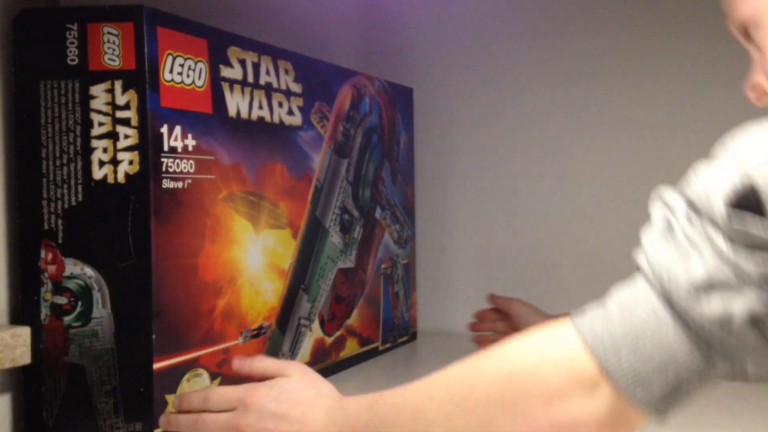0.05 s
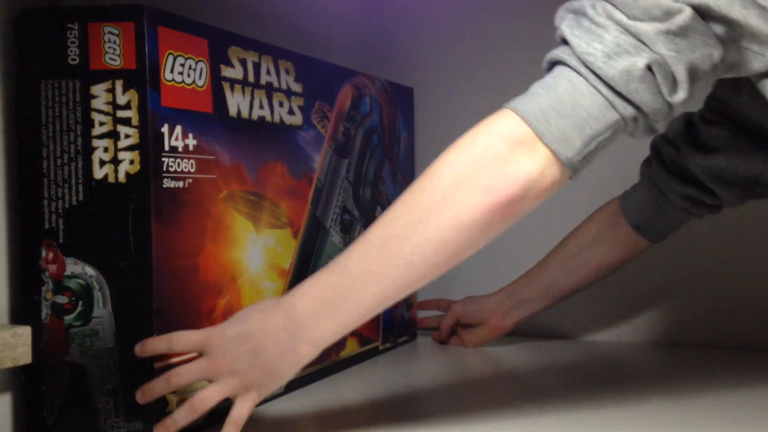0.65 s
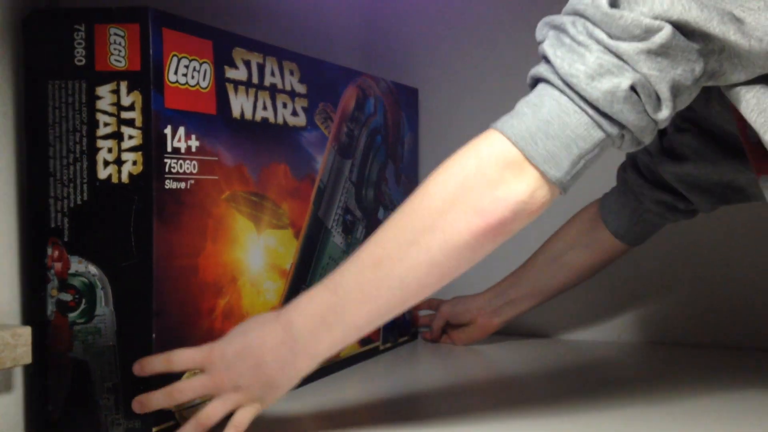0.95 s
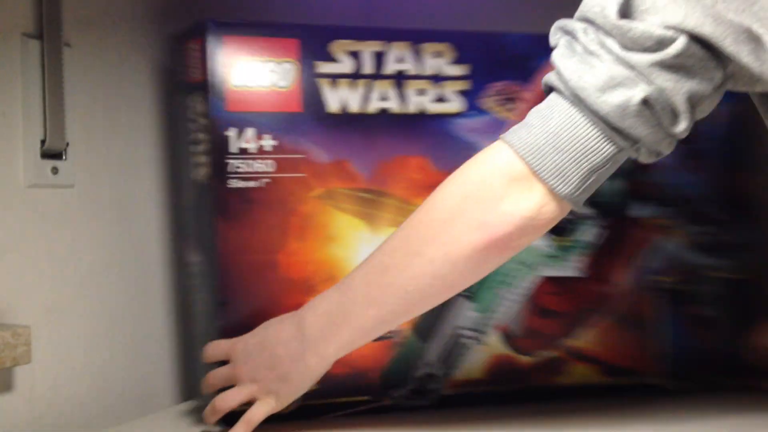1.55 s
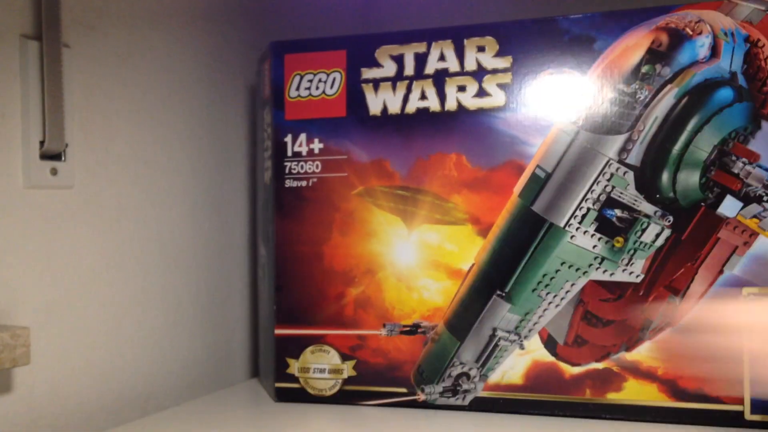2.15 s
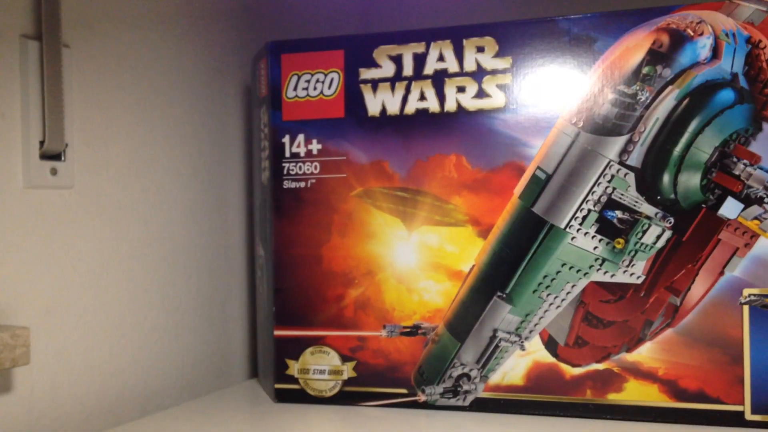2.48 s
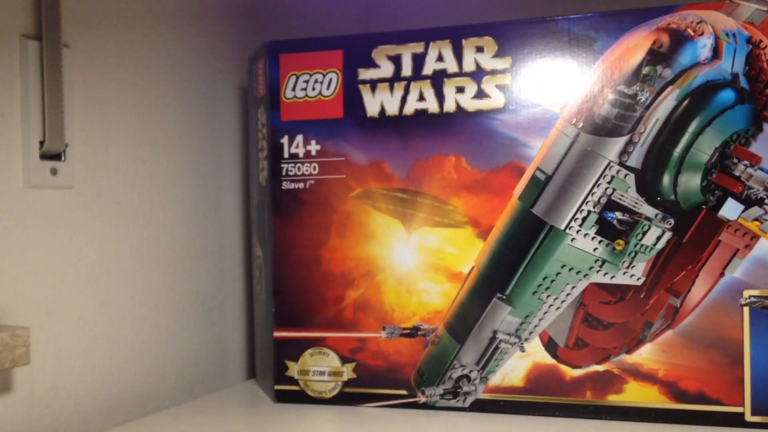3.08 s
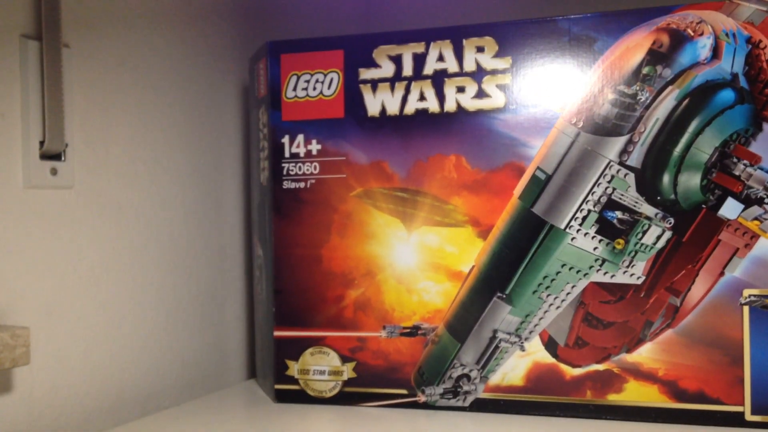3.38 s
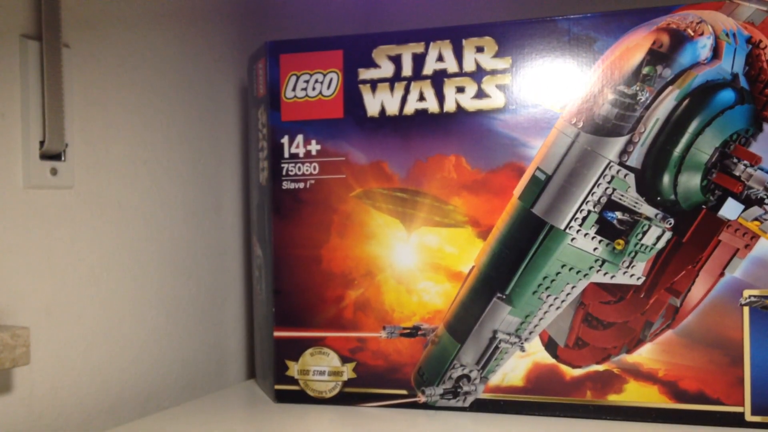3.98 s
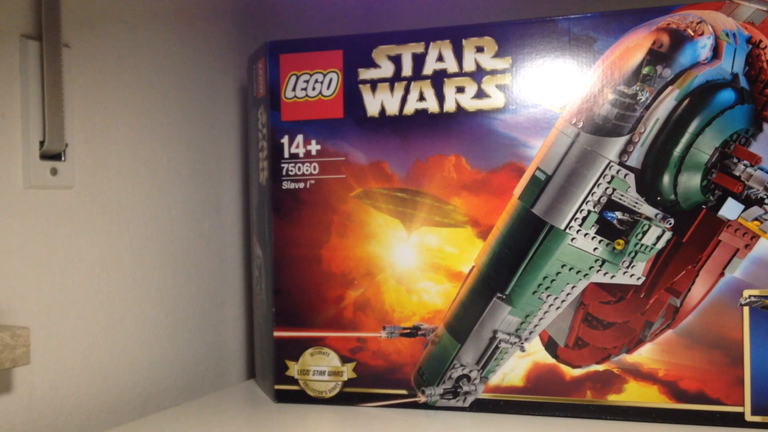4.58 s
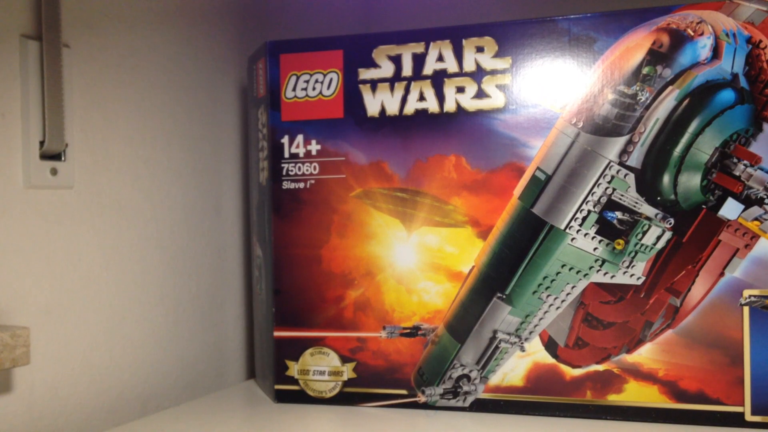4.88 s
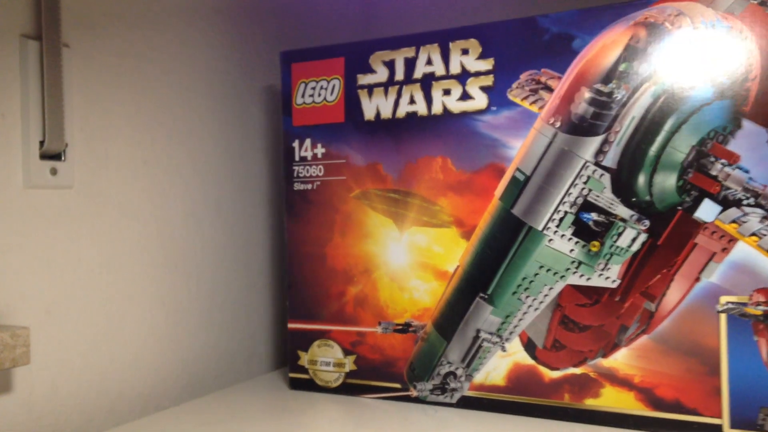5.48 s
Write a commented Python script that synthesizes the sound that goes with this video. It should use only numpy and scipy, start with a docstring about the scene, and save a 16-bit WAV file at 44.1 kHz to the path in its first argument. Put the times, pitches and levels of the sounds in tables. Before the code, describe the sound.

Hands grip and drag a large cardboard box across a shelf, with hollow knocks and a scrape, then bump the microphone.

```python
"""A small room with a large cardboard box on a shelf. Hands brush the box, grip it and drag it round:
skin and card catch and slip, the bottom edge scrapes and hisses, the hollow panels knock and wobble,
and the shelf sways. Sleeves swish, two soft thuds ring boards farther off, then a hand bumps and
rubs the camera. Faint mains hum and room air lie underneath."""
import sys
import numpy as np
from scipy import signal
from scipy.fft import rfft, irfft, next_fast_len
from scipy.io import wavfile
from scipy.ndimage import map_coordinates

SR = 44100
rng = np.random.default_rng(int(sys.argv[2]) if len(sys.argv) > 2 else 0)


def wrap_up_sound(samples):
    """Save the sound to the file named by the first command line argument, as 16-bit audio."""
    columns = np.atleast_2d(samples).T
    # keep every value between -1 and 1, then stretch to whole-number steps
    tamed = np.clip(columns, -1, 1)
    steps = np.round(tamed * 32767).astype(np.int16)
    wavfile.write(sys.argv[1], SR, steps)


N = 252693


def amp(db):
    """Decibels to gain."""
    return 10 ** (np.asarray(db) / 20)


def unit(x):
    """Scale to rms 1."""
    return x / np.sqrt(np.mean(x ** 2) + 1e-20)


def along(points, hz):
    """Read (Hz, value) points on a log frequency axis."""
    freqs, values = np.transpose(points)
    return np.interp(np.log(hz + 1), np.log(freqs + 1), values)


def filtered(x, response):
    """Pass x through a complex frequency response."""
    size = next_fast_len(len(x) + SR // 2)
    return irfft(rfft(x, size) * response(np.fft.rfftfreq(size, 1 / SR)), size)[:len(x)]


def coloured(x, eq):
    """Shape x with an EQ curve, at rms 1."""
    return unit(filtered(x, lambda hz: amp(along(eq, hz))))


def body(modes, f):
    """Frequency response of a set of resonances, alternating in polarity."""
    return sum((-1) ** k * amp(db) * 1j * f * width / (hz * hz - f * f + 1j * f * width)
               for k, (hz, width, db) in enumerate(modes))


def wander(rate, n):
    """A smooth random curve with `rate` turning points a second."""
    return map_coordinates(rng.standard_normal(int(n * rate / SR) + 4), [np.arange(n) * rate / SR])


def friction(catch_rate, catch_db, grain_db):
    """Fibres catching and letting go: noise that swells in slips and in tiny grains."""
    return rng.standard_normal(N) * amp(catch_db * wander(catch_rate, N) + grain_db * wander(1500, N))


def stroke(start, length, attack, release):
    """One movement's envelope: it builds, holds to its length, then loses 20 dB every release time."""
    t = np.arange(N) / SR - start
    return np.clip(t / attack, 0, 1) * amp(-20 * np.maximum(t - length, 0) / release)


def blow(modes, hard_hz):
    """A soft push rings a body, peak 1; a harder contact reaches the higher modes."""
    t = np.arange(SR // 2) / SR
    push = t * np.exp(-2 * np.pi * hard_hz * t)
    ring = filtered(push, lambda f: body(modes, f))
    return ring / np.abs(ring).max()


def add(track, start, sound):
    """Mix a sound into the track at a start in seconds."""
    part = track[max(round(start * SR), 0):][:len(sound)]
    part += sound[:len(part)]


# The dark bed of room air. Each row: frequency in Hz, EQ gain in dB.
AIR_EQ = [(25, -8), (60, -13.5), (100, -7.5), (200, -11), (300, -9), (420, -9), (560, -15.5), (1000, -18),
          (1600, -23), (4000, -26), (9000, -30), (15000, -32.5)]
# Mains harmonics. Each row: pitch in Hz, level in dB.
HUM_PARTIALS = [(100, -83.5), (300, -81), (400, -79.5), (500, -89.5)]

def room_tone():
    """Steady air under a mains hum whose partials waver in level."""
    t = np.arange(N) / SR
    hum = sum(amp(db + wander(2.77, N)) * np.sqrt(2) * np.sin(2 * np.pi * (hz * t + rng.random()))
              for hz, db in HUM_PARTIALS)
    return hum + amp(-70.5) * coloured(rng.standard_normal(N), AIR_EQ)


# Skin and sleeve swishes. Each row: start, length and release in seconds, relative level in dB.
BRUSH_STROKES = [(-.04, 0.085, 0.26, -46), (0.088, 0.18, 0.034, -61.5), (2.147, .03, 0.054, -64),
                 (2.19, .04, 0.033, -63), (2.654, 0.081, 0.19, -69.5), (2.745, 0.11, 0.052, -65.5),
                 (3.871, 0.028, 0.079, -62)]
# The airy top of cloth. Each row: frequency in Hz, EQ gain in dB.
CLOTH_EQ = [(300, -9), (1400, -12), (2150, -2.5), (2900, -5.5), (4300, 0), (5800, 1.5), (7800, 0),
            (11000, -5.5), (15500, -6)]

def brushes():
    """Light strokes of skin and sleeve catch fine fibres and swish."""
    strength = sum(amp(db) * stroke(start, length, attack=0.34 * length, release=release)
                   for start, length, release, db in BRUSH_STROKES)
    fibres = friction(catch_rate=70, catch_db=1, grain_db=2)
    return amp(-1) * strength * coloured(fibres, CLOTH_EQ)


# Hands shifting their grip. Each row: start and length in seconds, relative rub and rustle levels in dB.
HAND_MOVES = [(-.04, 0.23, -68.5, -72.5), (0.226, 0.11, -65.5, -79), (.465, 0.059, -61.5, -72.5),
              (0.57, 0.3, -74, -82.5), (0.71, 0.035, -60, -92), (0.831, 0.21, -57.5, -73.5),
              (1.893, 0.24, -66.5, -72.5), (2.203, 0.058, -67, -68), (2.327, 0.044, -65.5, -75.5),
              (2.404, 0.093, -77, -73.5), (2.53, 0.18, -83, -79.5), (3.028, 0.11, -77, -78.5),
              (3.146, 0.21, -67.5, -75), (3.4, 0.22, -85, -80), (3.583, 0.12, -67.5, -74),
              (4.86, .12, -71, -81.5), (4.995, 0.45, -66.5, -79.5), (5.233, 0.16, -62.5, -73.5),
              (5.35, 0.053, -54, -62.5), (5.45, .18, -59, -68), (5.639, 0.031, -52, -68)]
RUB_ATTACK_S, RUB_RELEASE_S = 0.029, 0.14

def rub_envelopes():
    """Strength of the palms' rub and of its rustle; overlapping movements add in power."""
    power = sum(np.outer(amp(levels), stroke(start, length, RUB_ATTACK_S, RUB_RELEASE_S)) ** 2
                for start, length, *levels in HAND_MOVES)
    return np.sqrt(power)


# The dull rub of a palm. Each row: frequency in Hz, EQ gain in dB.
SKIN_EQ = [(100, 7), (250, 7), (450, 5), (750, 0.5), (1300, -6), (2100, -7.5), (3000, -28.5), (6000, -27),
           (15000, -27.5)]
# The papery edge of rustles and ticks. Each row: frequency in Hz, EQ gain in dB.
RUSTLE_EQ = [(1500, 0), (3000, -3), (5000, -4.5), (9000, -7), (15000, -12)]

def rubs():
    """Palms creep over the surface in uneven slips, with a fine rustle on top."""
    rub, rustle = rub_envelopes()
    slips = friction(catch_rate=70, catch_db=1.5, grain_db=1.1)
    return rub * coloured(slips, SKIN_EQ) + amp(4) * rustle * coloured(slips, RUSTLE_EQ)


# Short slides of skin, sleeve and card. Each row: start and length in seconds, level in dB,
# pitch in Hz, glide as a share of the pitch, bandwidth in Hz.
SHORT_SLIDES = [(.005, .097, -50.5, 5980, -.05, 2600), (0, .11, -63, 2200, 0.0015, 500),
                (0.459, 0.089, -52.5, 749, .11, 760), (0.479, 0.068, -60, 1895, -0.075, 826),
                (1.07, .095, -52, 931, -0.0021, 600), (1.083, 0.087, -54.5, 1837, 0.111, 647),
                (1.642, .025, -40, 13050, 0, 2200), (1.726, .15, -49.5, 2066, -0.18, 625),
                (2.142, .091, -74, 8100, .1, 2600), (2.763, 0.088, -67, 7800, -.15, 2000),
                (3.231, 0.081, -57.5, 2416, -0.0027, 1100), (3.87, 0.05, -67, 2100, -0.0068, 1200),
                (4.576, 0.022, -64.5, 1497, -0.015, 550), (5.384, 0.15, -55, 2100, -.15, 440),
                (5.588, 0.044, -56, 911, -.11, 600)]

def slides():
    """A slide chatters in one band, with a weak octave; its pitch glides and wavers with the speed."""
    out = np.zeros(N)
    for start, length, db, hz, glide, width_hz in SHORT_SLIDES:
        progress = np.linspace(0, 1, int(length * SR))
        noise = rng.standard_normal(len(progress))
        chatter = unit(filtered(noise, lambda f: 1 / (1 + np.abs(2 * f / width_hz) ** 3)))
        pitch = hz * (1 + glide * (progress - 0.5) + 0.0309 * wander(151.6, len(progress)))
        phase = 2 * np.pi * np.cumsum(pitch) / SR
        tone = chatter * np.sin(phase) + amp(-20) * chatter ** 2 * np.sin(2 * phase)
        add(out, start, amp(db) * np.sin(np.pi * progress) * unit(tone))
    return out


# Deep sways of the shelf. Each row: start in seconds, level in dB.
SHELF_SWAYS = [(.25, -41), (3.248, -51)]

def shelf_sway():
    """Weight sets the shelf swaying; the deep swing sinks in pitch as it dies, under a dull shudder."""
    out, t = np.zeros(N), np.arange(SR) / SR
    hz = 43 + 14 * np.exp(-t / 0.036)
    swing = np.sin(2 * np.pi * np.cumsum(hz) / SR) * amp(-60 * t / 0.5)
    attack = 1 - np.exp(-t / 0.01)
    shudder_eq = [(30, -23), (75, 6), (130, -29), (300, -16), (800, -38)]
    for start, db in SHELF_SWAYS:
        shudder = coloured(rng.standard_normal(SR), shudder_eq) * amp(-60 * t / 0.49)
        add(out, start, amp(db) * (swing + amp(-4.5) * shudder) * attack)
    return out


GRIP_FROM_S, GRIP_TO_S = 0.67, 2.45

def grip_envelope():
    """Strength of the rub while the hands hold the box."""
    rub, _ = rub_envelopes()
    return rub * stroke(GRIP_FROM_S, GRIP_TO_S - GRIP_FROM_S, RUB_ATTACK_S, RUB_RELEASE_S)


# The hollow voice of the box. Each row: resonance in Hz, bandwidth in Hz, gain in dB.
BOX_MODES = [(63.6, 18, -12), (130.7, 26.7, 3), (227, 54, -3), (284, 110, -6.5), (389.6, 38, -2.5),
             (558, 47, -17), (945, 57, -22), (1076, 57, -15)]

def panel_wobble():
    """Gripping and dragging jolt the panels and keep them wobbling."""
    drive = amp(1) * grip_envelope() + amp(-13.5) * scrape_envelope()
    jolts = friction(catch_rate=50, catch_db=3, grain_db=0.5)
    panels = filtered(jolts, lambda f: body(BOX_MODES, f) / (1 + 1j * f / 600))  # duller above 600 Hz
    return drive * unit(panels)


# The midrange scuff on a hit. Each row: frequency in Hz, EQ gain in dB.
SCUFF_EQ = [(150, 1), (500, 14.5), (1100, 4.5), (1700, -1), (2300, -5.5), (3300, -4.5), (5000, -16.5),
            (9000, -18), (15000, -43)]

def scuff(t60, rise):
    """The short noise burst of two surfaces meeting."""
    t = np.arange(SR // 2) / SR
    return coloured(rng.standard_normal(len(t)), SCUFF_EQ) * amp(-60 * t / t60) * (1 - np.exp(-t / rise))


def finger_taps(per_second=20):
    """Fingertips tap the box at chance moments, louder as the grip rubs harder."""
    out, held_s = np.zeros(N), GRIP_TO_S - GRIP_FROM_S
    tap = blow(BOX_MODES, hard_hz=710) + amp(-7) * scuff(t60=0.05, rise=0.0004)
    for when, force in rng.random((int(per_second * held_s), 2)):
        add(out, GRIP_FROM_S + when * held_s, amp(4 * force - 1) * tap)
    return grip_envelope() * out


# Tiny clicks. Each row: start in seconds, level in dB.
NAIL_TICKS = [(0.709, -62), (.816, -59.5), (.869, -55.5), (.939, -67), (.971, -58), (0.987, -55),
              (1.934, -65), (2.276, -74)]

def nail_ticks():
    """Nails and card edges click in dry, fast-dying bursts."""
    out, t = np.zeros(N), np.arange(SR // 10) / SR
    for start, db in NAIL_TICKS:
        add(out, start, amp(db - 60 * t / 0.046) * coloured(rng.standard_normal(len(t)), RUSTLE_EQ))
    return out


# Hits on the box. Each row: start in seconds, level in dB, hardness in Hz, scuff level in dB.
BOX_KNOCKS = [(0.753, -43.5, 594, -59), (.774, -42, 330, -78), (.79, -44, 200, -78), (.817, -43, 250, -58),
              (.846, -51, 200, -70), (0.876, -45.5, 700, -52), (0.916, -43, 400, -71),
              (.938, -54, 700, -51), (.956, -47, 250, -66), (.98, -46, 900, -56), (1, -31.5, 480, -68),
              (1.024, -34, 260, -71), (1.244, -50, 500, -70), (1.686, -45, 800, -56),
              (1.934, -43.5, 800, -54), (1.968, -49, 250, -72), (2.372, -53, 800, -57),
              (2.754, -49.5, 150, -70), (3.573, -51, 387, -67)]

def box_knocks():
    """Fingers knock the hollow box, ringing its panels and scuffing the card."""
    out = np.zeros(N)
    for start, db, hard_hz, scuff_db in BOX_KNOCKS:
        ring = amp(db) * blow(BOX_MODES, hard_hz)
        add(out, start, ring + amp(scuff_db) * scuff(t60=0.05, rise=0.00071))
    return out


# Pulls on the box. Each row: start and length in seconds, scrape level in dB.
BOX_PULLS = [(1.055, 0.57, -54), (1.175, 0.18, -50), (1.562, 0.25, -51.5)]
PULL_ATTACK_S, PULL_RELEASE_S = 0.065, 0.19

def scrape_envelope():
    """Strength of the scrape: one long pull and two harder heaves, adding in power."""
    return np.sqrt(sum((amp(db) * stroke(start, length, PULL_ATTACK_S, PULL_RELEASE_S)) ** 2
                       for start, length, db in BOX_PULLS))


# The drag's speed, heard as hiss. Each row: time in seconds, relative level in dB.
DRAG_SPEED = [(1.08, -68), (1.11, -73), (1.33, -53.5), (1.404, -41), (1.472, -50), (1.584, -47.5),
              (1.66, -38), (1.674, -44), (1.714, -39), (1.92, -72.5)]
# The drag's low scrape, mid rasp and top hiss. Each row: frequency in Hz, EQ gain in dB.
SCRAPE_EQ = [(150, -7), (270, 0), (430, -1), (700, 1.5), (1100, -1.5), (1400, 0), (1800, 2), (2300, 0.5),
             (2900, -14), (4200, -11), (7500, -18), (15000, -16)]
RASP_EQ = [(1200, -25), (2400, 2.5), (3300, 2), (4500, -1), (6500, -15), (12000, -45)]
HISS_EQ = [(1500, -11), (3300, -24), (4500, -0.5), (6200, -0.5), (8000, -1.5), (10500, -2.5), (13200, -2.5),
           (15500, -3.5)]

def box_drag():
    """The bottom edge scrapes the shelf; gathering speed it rasps, and at full speed the card hisses."""
    times, speed_db = np.transpose(DRAG_SPEED)
    moving = stroke(times[0], times[-1] - times[0], PULL_ATTACK_S, PULL_RELEASE_S / 2)
    speed = amp(np.interp(np.arange(N) / SR, times, speed_db)) * moving
    pull = scrape_envelope()
    scrape = coloured(friction(catch_rate=45, catch_db=2, grain_db=1.5), SCRAPE_EQ)
    rasp = coloured(friction(catch_rate=52, catch_db=3, grain_db=2), RASP_EQ)
    hiss = coloured(friction(catch_rate=60, catch_db=1.46, grain_db=0.8), HISS_EQ)
    return pull * scrape + amp(-5.5) * np.sqrt(pull * speed) * rasp + amp(0.5) * speed * hiss


# The dull ring of boards. Each row: resonance in Hz, bandwidth in Hz, gain in dB.
BOARD_MODES = [(44, 7.3, -3.5), (110, 25, -1.5), (166, 37, 0), (239, 39, 2), (295, 32, 0.5), (393, 39, -2),
               (468, 20, -2), (634, 19, -4.5), (1170, 77, -18), (1550, 68, -12)]
# Blows that bunch into two thuds. Each row: start in seconds, level in dB, scuff level in dB.
THUD_BLOWS = [(3.233, -32.5, -57), (3.244, -32.5, -46.5), (3.257, -34, -58), (3.27, -40, -58),
              (4.57, -44.5, -78), (4.582, -42, -68), (4.605, -47.5, -68)]

def thuds():
    """Soft blows ring boards in the room, each with a scuff."""
    out = np.zeros(N)
    for start, db, scuff_db in THUD_BLOWS:
        ring = amp(db) * blow(BOARD_MODES, hard_hz=473)
        add(out, start, ring + amp(scuff_db) * scuff(t60=0.2, rise=0.00081))
    return out


# The low ring of the camera on its stand. Each row: resonance in Hz, bandwidth in Hz, gain in dB.
STAND_MODES = [(69.5, 12, -10), (125, 51, 4), (139.7, 8.4, -2), (260, 52, 1), (402, 41, -14)]
# Close handling hits. Each row: start in seconds, level in dB, hardness in Hz, tick level in dB.
CAMERA_BUMPS = [(5.045, -50, 900, -60), (5.188, -49.5, 884, -68), (5.374, -37, 300, -42),
                (5.38, -19, 171, -41), (5.43, -37.5, 150, -72), (5.446, -46, 148, -70),
                (5.56, -57, 1500, -42), (5.663, -41.5, 600, -66), (5.723, -45, 900, -36)]

def camera_bumps():
    """The hand meets the camera: a thump through its stand and a tick of the case."""
    out = np.zeros(N)
    for start, db, hard_hz, tick_db in CAMERA_BUMPS:
        tick = amp(tick_db) * scuff(t60=0.022, rise=0.00036)
        thump = amp(db) * blow(STAND_MODES, hard_hz)
        add(out, start, tick - thump)
    return out


def shelf_echoes(x, count):
    """The close walls of the shelf return a cluster of echoes that combs the sound."""
    delays = rng.uniform(0.002, 0.022, count)
    echoes = np.zeros(SR // 10)
    np.add.at(echoes, (delays * SR).astype(int), rng.choice([-1, 1], count) / np.sqrt(delays))
    return signal.fftconvolve(x, echoes / np.linalg.norm(echoes))[:N]


# The room's tail. Each row: frequency in Hz, seconds to fall 60 dB.
ROOM_DECAY = [(100, 0.47), (500, 0.24), (3000, 0.38), (12000, 0.14)]

def room_reverb(x):
    """The small room answers after 5 ms; the top treble dies first."""
    hz, t, noise = signal.stft(rng.standard_normal(SR // 2), SR, nperseg=256)
    decay = amp(-60 * t / along(ROOM_DECAY, hz)[:, None])
    _, tail = signal.istft(noise * decay, SR, nperseg=256)
    return signal.fftconvolve(x, np.pad(tail, (SR // 200, 0)) / np.linalg.norm(tail))[:N]


def scene():
    """The box is at arm's length, the thuds are farther off, the bumps are on the camera itself."""
    surface = box_drag() + brushes() + rubs() + slides() + nail_ticks()
    echoes = amp(-16) * shelf_echoes(surface, count=24)
    near = surface + echoes + panel_wobble() + box_knocks() + finger_taps()
    far = thuds()
    reverb_send = amp(-11) * near + amp(-7) * far
    return (near + far + shelf_sway() + camera_bumps() + room_reverb(reverb_send) + room_tone())[None]


LOW_CUT_HZ, HIGH_CUT_HZ = 36, 15450

def record(dry):
    """The camera drops the deepest bass and everything above its band limit."""
    low_cut = signal.butter(7, LOW_CUT_HZ, "highpass", fs=SR, output="sos")
    return filtered(signal.sosfilt(low_cut, dry[0]), lambda hz: hz < HIGH_CUT_HZ)[None]


dry = scene()
out = record(dry)
wrap_up_sound(out)
```